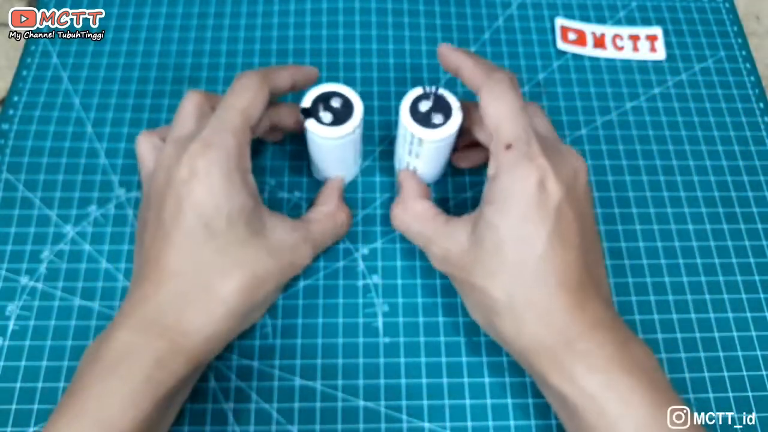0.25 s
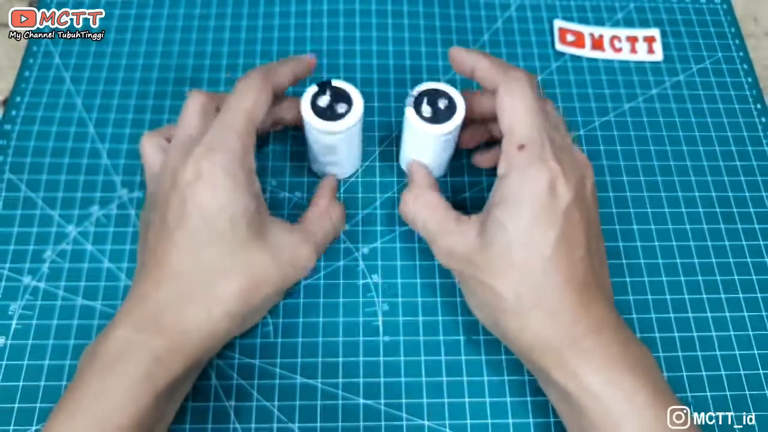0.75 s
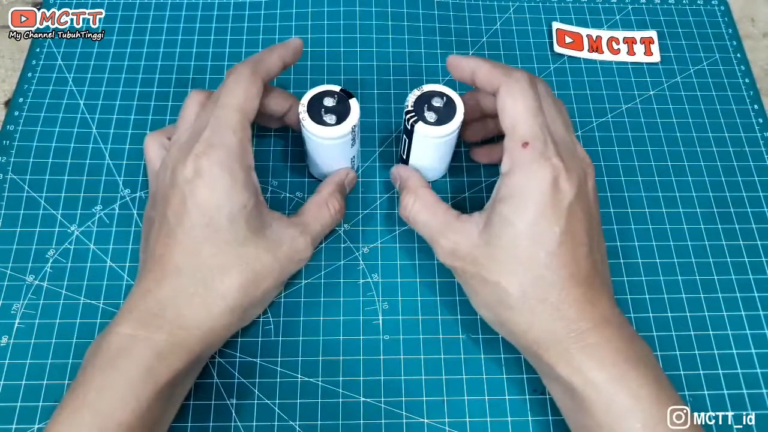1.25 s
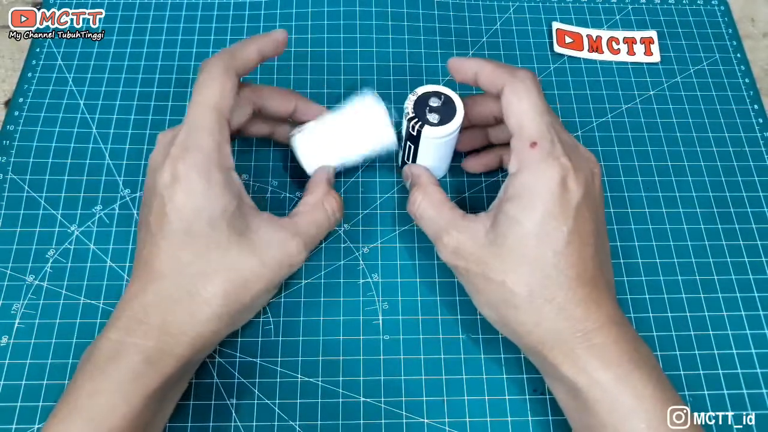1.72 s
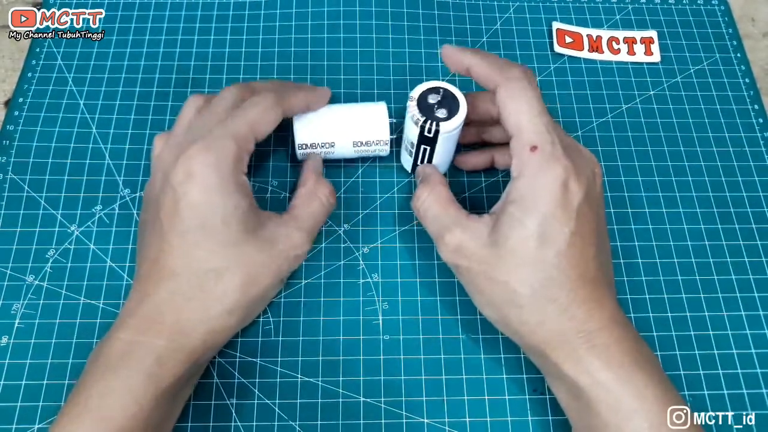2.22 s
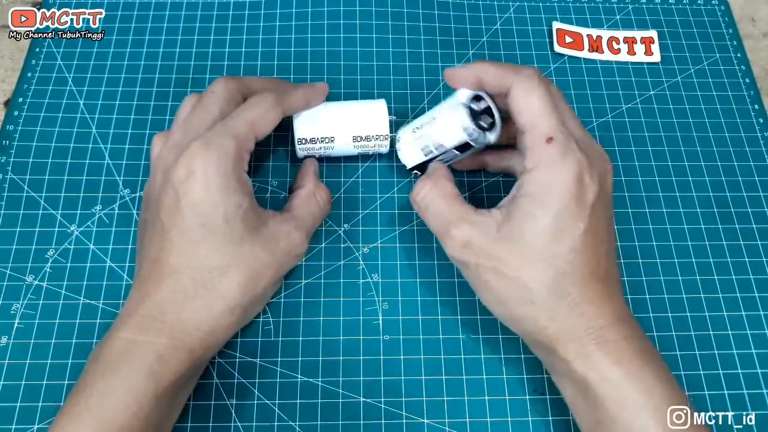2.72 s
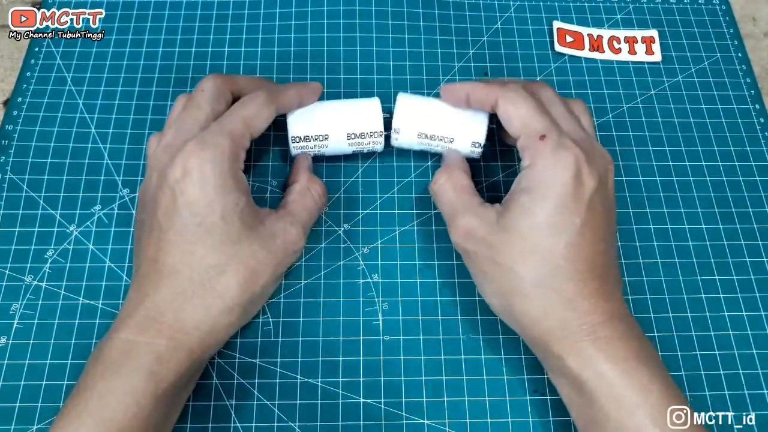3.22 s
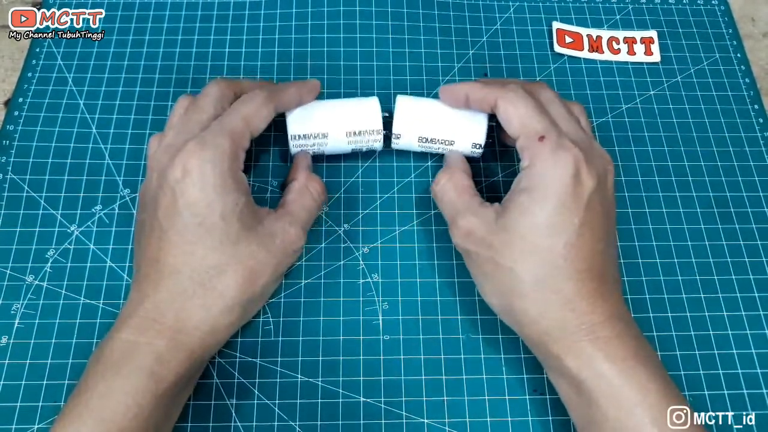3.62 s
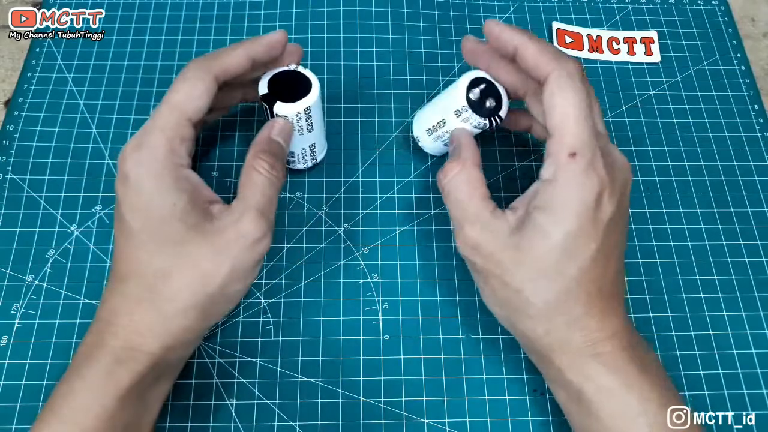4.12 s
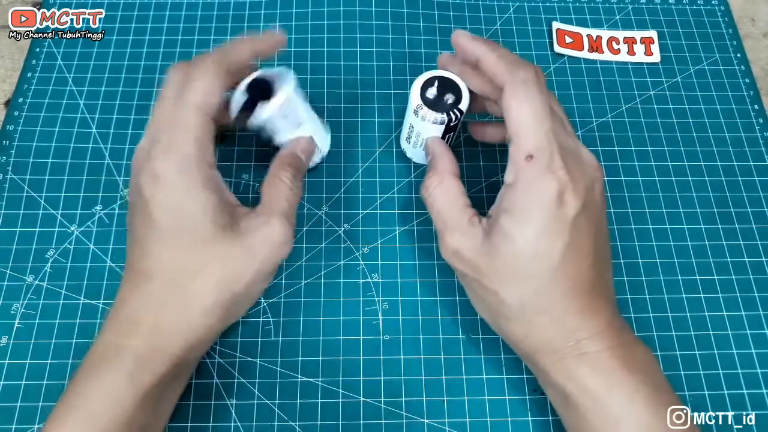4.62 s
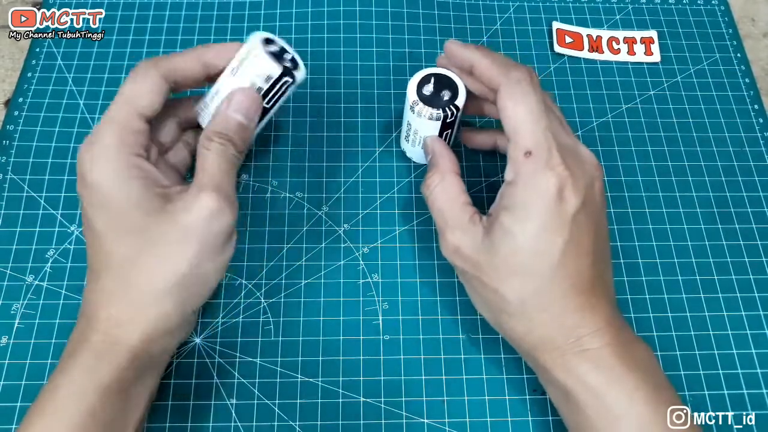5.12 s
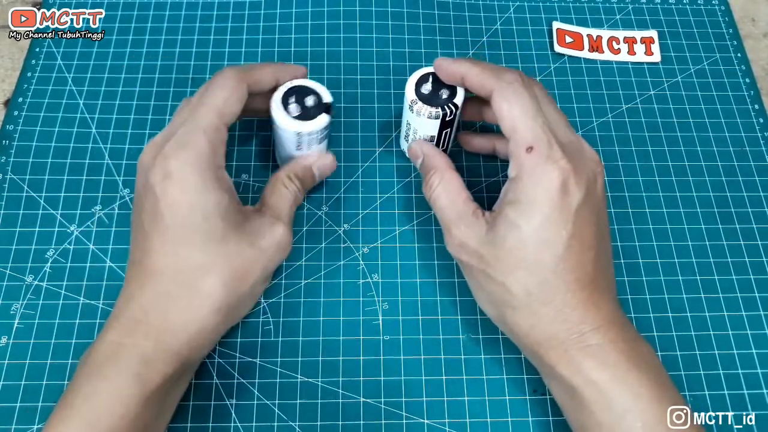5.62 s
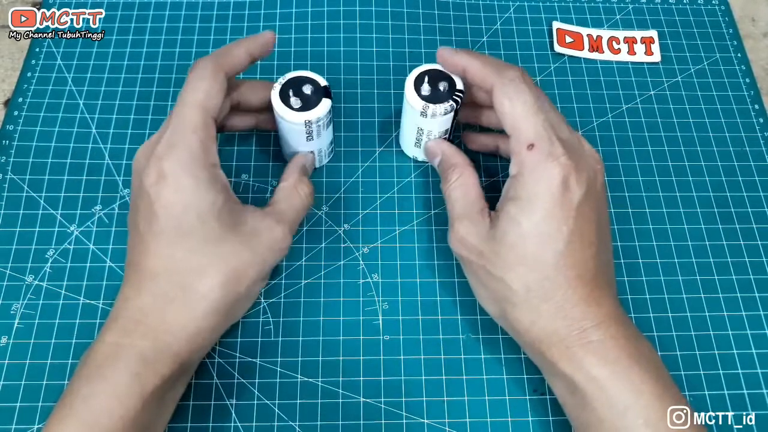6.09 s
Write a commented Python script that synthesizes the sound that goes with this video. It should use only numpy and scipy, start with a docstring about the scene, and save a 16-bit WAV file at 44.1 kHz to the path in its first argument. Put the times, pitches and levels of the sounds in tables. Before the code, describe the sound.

Two metal cans with plastic sleeves are tipped and stood on a cutting mat, dull thumps and clacks over low hum and fan.

```python
"""Two large can capacitors are turned, tipped over and stood up again on a cutting mat on a table.
Each knock sends a bending wave through the table top (treble first, bass last) and makes the can clack.
Cans drag on the mat as filtered, grainy noise; fingers rub, squeak and flick their plastic sleeves.
A small room answers, over mains hum made of steady tones and a fan made of coloured noise."""
import sys
import numpy as np
from scipy import signal
from scipy.fft import rfft, irfft
from scipy.io import wavfile

SR = 44100
rng = np.random.default_rng(int(sys.argv[2]) if len(sys.argv) > 2 else 0)


def to_wav(s):
    """Save 16-bit WAV."""
    ch = np.atleast_2d(s).T  # columns
    pcm = np.round(np.clip(ch, -1, 1) * 32767)  # PCM
    wavfile.write(sys.argv[1], SR, pcm.astype(np.int16))


N = 280035
TIME = np.arange(N) / SR
SHORT = TIME[:SR // 4]   # a quarter second, for single hits
SHORT_HZ = np.fft.rfftfreq(len(SHORT), 1 / SR) + 1   # just above zero, so it can be divided by

# Steady mains tones: f/Hz, rms level/dB
MAINS_TONES = [(50, -74), (100, -53), (150, -55), (200, -65.5), (250, -58), (350, -59.5)]
# Narrow whines of the fan: f/Hz, width/Hz, rms level/dB
FAN_WHINES = [(390.5, 110, -54.5), (614, 17, -66.5), (827, 23, -67), (1168.6, 48, -68), (1603, 170, -70),
              (2312, 100, -71.5)]
# Colour of the fan's rush: f/Hz, gain/dB
FAN_COLOUR = [(20, -24), (45, -13.5), (85, 1), (150, 1.5), (400, -2), (600, -8), (800, -13.5), (1000, -27),
              (1400, -22.5), (1950, -36), (3500, -40), (8000, -59)]
FAN_DB = -49

# Fingers slide on a sleeve: start t/s, end t/s, level/dB before the room, centre f/Hz
RUBS = [(.056, 0.327, -66, 4300), (0.618, 0.782, -55, 5240), (2.91, 2.953, -64, 2980),
        (3.382, 3.506, -61.5, 2880), (3.753, 3.89, -77, 3300), (5.177, 5.34, -62.5, 3070),
        (5.941, 6.095, -64, 6420)]
RUB_OCTAVES = 0.99
# A can is dragged over the mat: start t/s, end t/s, shudder level/dB, scrape level/dB
DRAGS = [(0.062, 0.337, -50.5, -70.5), (0.674, 0.81, -43, -61), (2.646, 2.812, -41.5, -62.5),
         (2.827, 2.976, -37, -52), (3.092, 3.414, -49, -61.5), (3.746, 3.914, -46, -53.5),
         (3.948, 4.051, -43, -57)]
SCRAPE_HZ, SCRAPE_OCTAVES = 840, 1.44
# Faint squeaks of a twisted can, and at 4.1 kHz of a finger on the sleeve: start t/s, end t/s, level/dB before
# the room, pitch f/Hz
SQUEAKS = [(2.917, 2.958, -50, 4100), (4.072, 4.127, -59.5, 990), (4.198, 4.262, -54.5, 960),
           (4.687, 4.857, -60.5, 970)]
SQUEAK_OCTAVES, SQUEAK_OVERTONE_DB = 0.17, -21.5
SWELL = 0.6   # shape of a hand movement: low starts abruptly, high eases in and out

# A can lands or rocks: t/s, thump level/dB, contact corner f/Hz (low is soft), face that hits
KNOCKS = [ (.646, 17.5, 208, "base"), (.66, 17.5, 200, "base"), (0.774, 13, 246, "base"),
          (.911, 22.5, 178, "base"), (1.7619, 37.5, 876, "side"), (1.7828, 21.5, 1010, "side"),
          (2.046, 20.5, 460, "side"), (2.686, 10, 350, "base"), (2.731, 20, 267, "base"),
          (2.9213, 22.5, 450, "rim"), (2.984, 34, 585, "edge"), (3.8905, 14.5, 463, "rim"),
          (3.986, 24, 188, "slant"), (4.2966, 36.5, 453, "base"), (4.489, 34, 166, "slant"),
          (4.622, 17, 200, "base"), (5.522, 36.5, 342, "slant"), (5.692, 13, 240, "base")]
# How each face meets the mat: clack level/dB against the thump, clack corner f/Hz,
# favoured clack f/Hz, level/dB of that resonance
FACES = {"side": (-29.5, 6401, 2992.5, -5), "edge": (-25, 6100, 1878, 3.5), "base": (-40.5, 3400, 3035, -4),
         "slant": (-25, 3800, 828, 10), "rim": (-24, 6500, 932, 12)}
FIRM_DB, FIRM_CONTACT_HZ = 36, 450   # the firm landing for which the faces are given
CLACK_DB_PER_OCTAVE = 11.5   # a harder contact clacks louder
BRIGHTEN_OCTAVES_PER_DB = 0.19   # a stronger knock clacks brighter
# Table top resonances: f/Hz, width/Hz, level/dB
TABLE_MODES = [(157.8, 52.4, 0.5), (208, 93, -3), (366, 61, -3.5), (456, 23, -22), (606.4, 70, -4.5),
               (694, 80, -6), (790, 41, -1), (878, 23, 0.5)]
# Aluminium can resonances: f/Hz, width/Hz, level/dB
CAN_MODES = [(1060, 60, -10), (1250, 51, -3.5), (1484, 55, 4.5), (1800, 40, 3), (2210, 57, -11),
             (2990, 130, -1.5), (3600, 170, -8), (4430, 200, 0.5), (5200, 170, 2.5)]
# Colour of a can's clack: f/Hz, gain/dB
CLACK_COLOUR = [(400, -16.5), (900, 1.5), (1400, 1), (3500, -3.5), (6000, -3.5), (8500, -7), (9900, -26.5),
                (11500, -13.5), (15000, -16)]

# A fingernail flicks a sleeve: t/s, level/dB before colouring, corner f/Hz
FLICKS = [(0.724, -7.5, 19000), (2.9273, -6.5, 5000), (3.889, -15, 8400), (4.4866, -13.5, 7700),
          (5.2366, -29, 9050), (5.521, -22, 16000), (5.965, -23, 8940)]
# Colour of a sleeve flick: f/Hz, gain/dB
FLICK_COLOUR = [(1000, -41), (3500, -7), (5500, -2), (8000, 1.5), (10000, -10), (13000, 4), (15500, 3)]

# Colour of the room's answer: f/Hz, gain/dB
ROOM_COLOUR = [(100, -7.5), (300, -4), (600, -3), (950, -7), (1300, 1.5), (2000, -2.5), (4500, -3.5),
               (8000, -10), (15000, -5)]
ROOM_T60_S, ROOM_DB, FIRST_ECHO_S = 0.29, -8.5, 0.0083   # T60 is the time to fade by 60 dB

# Colour of the microphone hiss: f/Hz, gain/dB
HISS_COLOUR = [(1500, -10.5), (3500, -12.5), (4400, -0.5), (5600, -3), (6300, 4), (6900, -5.5),
               (7500, -2.5), (8700, -5.5), (9400, -13), (15000, -12)]
HISS_DB, CUTOFF_HZ = -60.5, 15700


def from_db(db):
    """Decibels to gain."""
    return 10 ** (np.asarray(db) / 20)


def rms_one(x):
    """Scale to an rms (average strength) of 1."""
    return x / np.sqrt(np.mean(x ** 2) + 1e-20)


def add(track, s, sound):
    """Mix a sound into a track, starting at s seconds."""
    i = round(s * SR)
    track[i:i + len(sound)] += sound[:N - i]


def between(x, start, end):
    """The stretch of a sound from start to end seconds."""
    return x[round(start * SR):round(end * SR)]


def colour(x, points):
    """Filter by a spectrum given as (Hz, dB) points."""
    hz, db = np.transpose(points)
    bins = np.fft.rfftfreq(len(x), 1 / SR) + 1
    gain = from_db(np.interp(np.log(bins), np.log(hz), db))
    return irfft(rfft(x) * gain, len(x))


def soften(x, corner_hz):
    """Two-pole low-pass: a longer contact carries less treble."""
    corner_hz = min(corner_hz, SR / 2 - 100)
    return signal.sosfilt(signal.butter(2, corner_hz, fs=SR, output="sos"), x)


def resonate(x, hz, width):
    """One resonance with gain 1 on top; a narrow one rings longer."""
    r = np.exp(-np.pi * width / SR)
    forward = np.array([1, 0, -1]) * (1 - r * r) / 2
    feedback = [1, -2 * r * np.cos(2 * np.pi * hz / SR), r * r]
    return signal.lfilter(forward, feedback, x + 1e-18)


def hump(x, centre_hz, octaves):
    """Keep a smooth band around a centre."""
    bins = np.fft.rfftfreq(len(x), 1 / SR) + 1
    away = np.log2(bins / centre_hz) / octaves
    return irfft(rfft(x) / (1 + away ** 2 / 2) ** 2, len(x))


def background():
    """Mains hum of steady tones, and a fan's rush and narrow whines of filtered noise."""
    out = from_db(FAN_DB) * rms_one(colour(rng.standard_normal(N), FAN_COLOUR))
    for hz, db in MAINS_TONES:
        tone = np.sin(2 * np.pi * (hz * TIME + rng.random()))
        out += from_db(db) * rms_one(tone)
    for hz, width, db in FAN_WHINES:
        whine = resonate(resonate(rng.standard_normal(N), hz, width), hz, width)
        out += from_db(db) * rms_one(whine)
    return out


def grainy(rough_db, grain_hz):
    """White noise whose strength jumps about as surfaces catch and slip."""
    catch = rms_one(soften(rng.standard_normal(N), grain_hz))
    return rng.standard_normal(N) * from_db(rough_db * catch)


def table(force):
    """The table top's resonances, all pushed the same way by the force."""
    return sum(from_db(db) * resonate(force, hz, width) for hz, width, db in TABLE_MODES)


def movement(x, db):
    """One hand movement: the sound swells and fades with its speed."""
    speed = rms_one(np.hanning(len(x)) ** SWELL)
    return from_db(db) * speed * rms_one(x)


def strokes(mat_hz):
    """A dragged can shudders the table and scrapes; skin on the sleeve swishes; a twist or a finger squeaks."""
    out = np.zeros(N)
    shudder = soften(table(grainy(rough_db=1.5, grain_hz=69.5)), mat_hz)
    grip = from_db(0.64 * rms_one(soften(rng.standard_normal(N), 40)))   # finger pressure wavers
    friction = grip * grainy(rough_db=3.3, grain_hz=700)
    for start, end, db, centre_hz in RUBS:
        rub = hump(between(friction, start, end), centre_hz, RUB_OCTAVES)
        add(out, start, movement(rub, db))
    for start, end, shudder_db, scrape_db in DRAGS:
        scrape = hump(between(friction, start, end), SCRAPE_HZ, SCRAPE_OCTAVES)
        add(out, start, movement(between(shudder, start, end), shudder_db))
        add(out, start, movement(scrape, scrape_db))
    for start, end, db, hz in SQUEAKS:
        slip = between(friction, start, end)
        overtone = from_db(SQUEAK_OVERTONE_DB) * hump(slip, 2 * hz, SQUEAK_OCTAVES)
        add(out, start, movement(hump(slip, hz, SQUEAK_OCTAVES) + overtone, db))
    return out


def room(x):
    """The reflections heard from one spot on the table; they build up fast and die quickly."""
    t = TIME[:SR // 2]
    build_up = 1 - np.exp(-(t / FIRST_ECHO_S) ** 4)
    fade = np.exp(-np.log(1000) * t / ROOM_T60_S)
    tail = rng.standard_normal(len(t)) * build_up * fade
    echoes = colour(tail / np.linalg.norm(tail), ROOM_COLOUR)
    return from_db(ROOM_DB) * signal.fftconvolve(x, echoes)


def burst(decay_s, points):
    """A dying cluster of micro-impacts, nearly even in spectrum and of unit energy before colouring."""
    lead = SR // 200   # silence in front while filtering, cut off again afterwards
    fade = np.exp(-SHORT / decay_s)
    x = rng.standard_normal(len(SHORT))
    for _ in range(3):   # flatten the spectrum again after each fade
        spectrum = rfft(x * fade)
        x = irfft(spectrum / np.abs(spectrum), len(SHORT))
    x = x * fade
    return colour(np.pad(x / np.linalg.norm(x), (lead, 0)), points)[lead:]


def bending_wave(lag_s, at_hz, steepness):
    """A click spread into a falling chirp: low bending waves travel slowest."""
    delay = lag_s * (at_hz / np.maximum(SHORT_HZ, at_hz / 2)) ** steepness
    phase = 2 * np.pi * np.cumsum(delay) * SR / len(SHORT)
    return irfft(np.exp(-1j * phase), len(SHORT))


def knocks(ring_db, scatter_db, low_cut_hz, mat_cut_hz, focus_share, squash_s, thump_room_db):
    """Each landing sets the can clacking and, once the mat is squashed, thumps the table."""
    out = np.zeros(N)
    wave = table(bending_wave(lag_s=0.006886, at_hz=203.6, steepness=1.05))
    wave = signal.sosfilt(signal.butter(2, low_cut_hz, "high", fs=SR, output="sos"), wave)
    wave = signal.sosfilt(signal.butter(3, mat_cut_hz, fs=SR, output="sos"), wave)
    click = signal.unit_impulse(len(SHORT))   # one hard contact
    ring = np.zeros(len(SHORT))
    for k, (hz, width, db) in enumerate(CAN_MODES):
        ring += (-1) ** k * from_db(db) * resonate(click, hz, width)   # neighbours move opposite ways
    for s, thump_db, contact_hz, face in KNOCKS:
        face_db, face_hz, focus_hz, focus_db = FACES[face]
        hardness_octaves = np.log2(contact_hz / FIRM_CONTACT_HZ)
        clack_db = thump_db + face_db + CLACK_DB_PER_OCTAVE * hardness_octaves
        clack_hz = face_hz * 2 ** (BRIGHTEN_OCTAVES_PER_DB * (thump_db - FIRM_DB))
        # the walls hear the can from all sides, so its peaks even out
        clack = from_db(scatter_db) * colour(room(click), CLACK_COLOUR)
        add(clack, 0, burst(decay_s=0.018, points=CLACK_COLOUR) + from_db(ring_db) * ring)
        clack = clack + from_db(focus_db) * resonate(clack, focus_hz, focus_share * focus_hz)
        thump = from_db(thump_db) * soften(wave, contact_hz)
        add(out, s, from_db(clack_db) * soften(clack, clack_hz))
        add(out, s + squash_s, thump)
        add(out, s + squash_s, from_db(thump_room_db) * room(thump))
    return out


def flicks():
    """Tiny bright snaps of the plastic sleeve: short noise bursts, softened by the contact."""
    out = np.zeros(N)
    for s, db, corner_hz in FLICKS:
        snap = burst(decay_s=0.01, points=FLICK_COLOUR)
        add(out, s, from_db(db) * soften(snap, corner_hz))
    return out


def scene():
    """Everything is heard from one point above the table."""
    fingers = strokes(mat_hz=467) + flicks()
    landings = knocks(ring_db=-2.5, scatter_db=4.0, low_cut_hz=124, mat_cut_hz=960,
                      focus_share=0.12, squash_s=0.0011, thump_room_db=-1.5)
    mono = background() + fingers + room(fingers)[:N] + landings
    return np.array([mono, mono])


def record(dry):
    """The microphone adds hiss, nearly alike in both channels; the highest peaks are rounded, the top cut."""
    mid = rms_one(colour(rng.standard_normal(N), HISS_COLOUR))
    side = rms_one(colour(rng.standard_normal(N), HISS_COLOUR))
    left_right = np.array([[1], [-1]])   # the side part is opposite in the two channels
    heard = dry + from_db(HISS_DB) * (mid + from_db(-13.0) * side * left_right)
    rounded = heard / (1 + (heard / 0.96) ** 6) ** (1 / 6)
    return signal.sosfilt(signal.ellip(10, 0.1, 80, CUTOFF_HZ, fs=SR, output="sos"), rounded)


dry = scene()
out = record(dry)
to_wav(out)
```